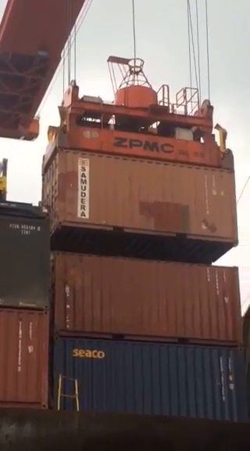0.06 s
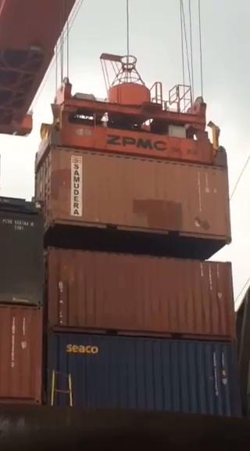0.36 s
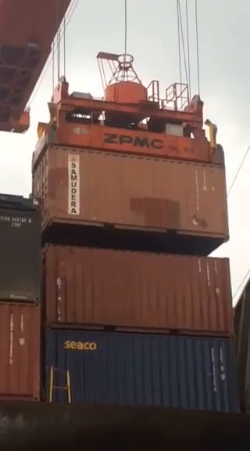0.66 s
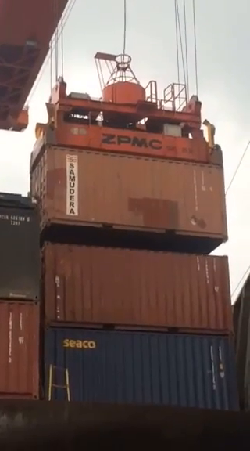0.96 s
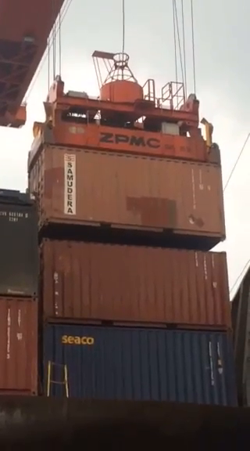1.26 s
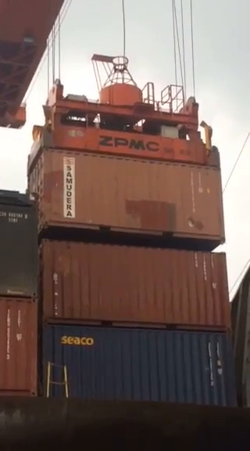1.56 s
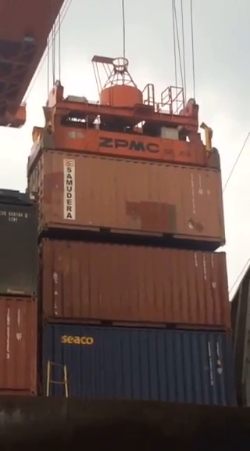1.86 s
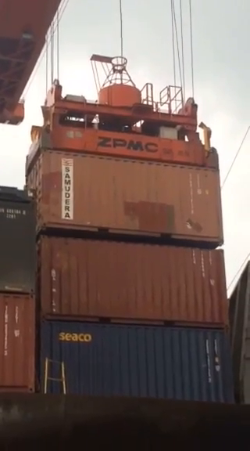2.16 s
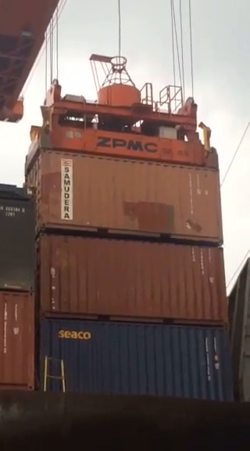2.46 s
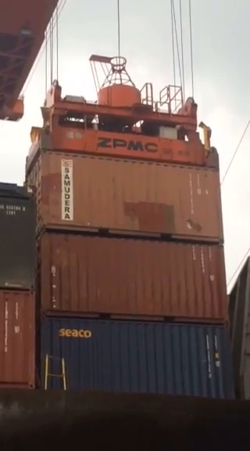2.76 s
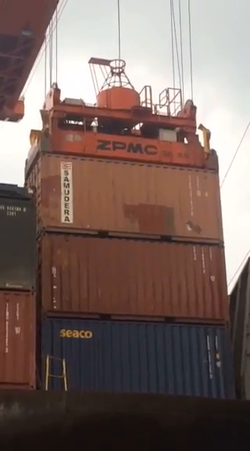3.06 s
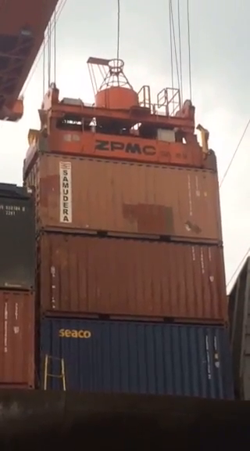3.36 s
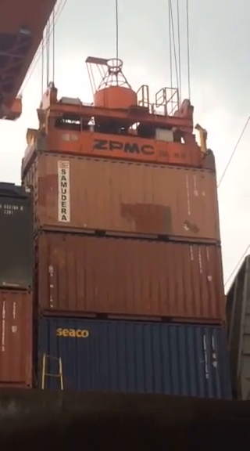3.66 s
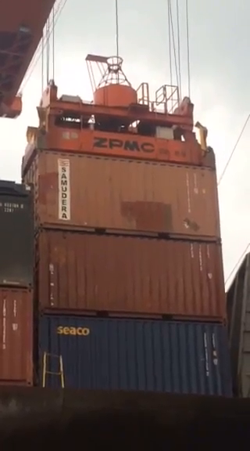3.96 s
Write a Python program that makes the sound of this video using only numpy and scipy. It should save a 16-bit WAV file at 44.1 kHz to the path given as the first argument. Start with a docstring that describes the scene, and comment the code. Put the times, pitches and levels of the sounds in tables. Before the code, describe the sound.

Metal clashes and deep hollow booms ring out as a crane lands a shipping container, tens of metres away outdoors. Before that come a steady engine rumble, a thin drive whine, a short hiss and a first boom.

```python
"""A crane sets a steel container on a stack, some tens of metres away in a port.
At first machinery rumbles and sings while the hoist drive whines. Near 1 s comes a dull pop, like wind
on the microphone, then a hiss, and at 1.5 s a first boom. From about 2.7 s the corners scrape and clash
and the hollow boxes boom. Last, the spreader (the crane's lifting frame) rattles as it settles,
and the whine fades. Steel walls all round smear every clash and boom."""
import sys
import numpy as np
from scipy import signal
from scipy.fft import rfft, irfft
from scipy.io import wavfile

SR = 44100
rng = np.random.default_rng(int(sys.argv[2]) if len(sys.argv) > 2 else 0)


def master_out(mix):
    """Clip the mix to full scale and print it as 16-bit PCM to the path in sys.argv[1]."""
    frames = np.transpose(np.atleast_2d(mix))
    ceiling = np.clip(frames, -1, 1)
    pcm = np.round(ceiling * 32767).astype(np.int16)
    wavfile.write(sys.argv[1], SR, pcm)


N = 176400
T = np.arange(N) / SR
FREQS = np.maximum(np.arange(N // 2 + 1) * SR / N, 1)

# Steel hits steel. Each row: start in seconds, level in dB, rise in seconds, tilt in dB per octave.
STEEL_HITS = [(1.495, -40, 0.0086, 0), (1.77, -36, 0.071, -1), (2.745, -31, 0.022, -23),
              (2.825, -33, 0.029, -2.5), (2.885, -25, 0.028, -2), (2.93, -25.5, 0.065, 1),
              (3.024, -21.5, 0.0053, -0.5), (3.052, -23, 0.009, -1.5), (3.103, -32, 0.0075, 2),
              (3.165, -29, 0.024, -1), (3.218, -24.5, 0.015, 2), (3.244, -21, 0.009, 5),
              (3.288, -24.5, 0.0092, 0), (3.319, -21.5, 0.01, 1), (3.341, -20, 0.005, -12),
              (3.354, -25, 0.0035, 0.5), (3.41, -35.5, 0.016, -1), (3.535, -41, 0.0097, 7),
              (3.62, -30.5, 0.01, 1.5), (3.648, -29, 0.015, -6), (3.728, -38, 0.004, 5.5),
              (3.78, -44, 0.017, 5.5)]
# The tone colour of a clash. Each row: frequency in Hz, relative level in dB.
CLASH_SPECTRUM = [(150, -20.5), (300, 0), (480, 2), (750, -2.5), (1050, 0), (1450, -3.5), (1900, -6),
                  (3000, -13), (4500, -20), (6500, -26.5), (9000, -37)]
# How a clash dies away. Each row: frequency in Hz, fade time (t60, the time to fall 60 dB) in seconds.
CLASH_FADES = [(200, 0.68), (1000, 0.57), (3000, 0.38), (8000, 0.23)]
# Ringing frames and corners. Each row: pitch in Hz, relative level in dB, fade time in seconds.
FRAME_NOTES = [(468.5, 5.5, 0.3), (583, 1, 0.53), (655.7, 12.5, 0.27), (787, -10, 0.27), (908, 2, 0.83),
               (1054, -10.5, 0.96), (1112, -7.5, 1), (1310, 8.5, 0.35), (1450, -15, 0.34), (1703, -9, 0.22),
               (1728, -2, .4), (2010, -3, 0.77), (2663, -9, 0.34)]
# The load falls on the hollow boxes. Each row: start in seconds, level in dB, favoured pitch in Hz,
# spread in octaves, rise in seconds, fade time in seconds.
BOX_BLOWS = [(1.498, -21.5, 132, 0.85, 0.0039, 0.37), (2.914, -37, 250, 0.33, 0.0043, 0.41),
             (3.084, -16.5, 198, 0.2, 0.013, 1.4), (3.153, -17.5, 75, 0.088, 0.013, 0.4),
             (3.205, -16, 74.4, 0.18, 0.033, 0.78), (3.249, -18.5, 259, 0.24, 0.0062, 0.88),
             (3.261, -18, 202, 0.061, 0.032, 0.94), (3.335, -22, 129, 1.23, 0.0053, 0.74),
             (3.423, -20.5, 69, 0.59, 0.0091, .7), (3.484, -22, 154, 1.22, 0.0048, 1.66),
             (3.51, -20, 96.6, 0.13, 0.028, 2.2), (3.631, -17, 83.5, 0.41, 0.018, 0.8),
             (3.645, -21, 204, 0.13, 0.026, 0.72), (3.729, -22, 99, 0.15, 0.011, 1),
             (3.89, -28, 100, 0.24, .02, 2)]
# Wall and floor panels. Each row: pitch in Hz, relative level in dB, fade time in seconds.
PANEL_NOTES = [(59.5, 3, 0.6), (76.7, -10, 1.3), (98.4, -4, 1.8), (119, 9.5, 0.5), (158, 9, 0.5),
               (193.8, 3, 1.5), (202.9, -4, 2.6), (230.6, 3.5, 2), (262.8, -5.5, 1.3), (322, -8.5, 0.6),
               (355, -17, 0.6), (397, -9.5, 0.6)]
# Dull low thumps: a microphone pop, then knocks during the landing.
# Each row: time in seconds, level in dB, pitch in Hz.
LOW_THUMPS = [(0.9101, -18, 270), (0.922, -26, 168), (.933, -26.5, 200), (3.033, -16, 201),
              (3.2315, -13, 112), (3.261, -10.5, 214), (3.43, -16, 126), (3.487, -12, 175),
              (3.643, -13, 90), (3.942, -24.5, 293.4)]
# The drive's main switching tones. Each row: pitch in Hz, starting point for the level in dB.
WHINE_TONES = [(3977.5, -51.5), (4002, -67), (4026, -58)]
# The whine over time. Each row: time in seconds, dB added to the main tones, then the levels in dB
# of the lower side tone, the upper side tone and the doubled tone.
WHINE_LEVELS = [(0, 2, -64, -66, -67), (.2, 1.5, -60, -54, -66), (.65, 1.5, -60, -67.5, -60.5),
                (1.35, 0, -62, -54, -64), (1.7, -1.5, -66, -68, -69.5), (2.35, 1.5, -53, -62, -63.5),
                (2.8, -4.5, -58, -63, -73), (3.5, -6, -65, -80, -73), (4, -14, -81, -76, -74)]
# Two singing tones. Each row: time in seconds, lower tone's level in dB, upper tone's level in dB.
SINGING_LEVELS = [(0, -57, -56.5), (.25, -40.5, -48.5), (.5, -40, -55), (.7, -43.5, -56), (.85, -55, -56.5),
                  (1.35, -58, -56.5), (1.55, -43.5, -47), (1.68, -42, -52), (1.97, -48.5, -44.5),
                  (2.12, -44, -59), (2.62, -54, -57), (2.82, -50.5, -45), (2.92, -62.5, -62),
                  (4, -67, -64.5)]
# The lower singing tone turns rough. Each row: time in seconds, unsteady share from 0 to 1.
SINGING_ROUGHNESS = [(.6, 0.04), (1.5, 0.28)]
# The tone colour of the machinery. Each row: frequency in Hz, relative level in dB.
MACHINE_SPECTRUM = [(22, -29), (35, -13), (55, -3.5), (102, 0), (150, -2), (212, -4.5), (330, -11.5),
                    (474, -15.5), (800, -16.5), (1550, -21.5), (2500, -28), (3640, -34), (4500, -38.5),
                    (8000, -45), (9000, -45.5)]
# The machinery over time. Each row: time in seconds, bass level in dB, treble level in dB.
MACHINE_LEVELS = [(0, -35, -40), (.45, -32, -41), (.7, -33, -39.5), (1.2, -33.5, -41), (1.65, -29, -38.5),
                  (2.2, -30, -39.5), (2.45, -28, -40.5), (2.62, -27.5, -41), (2.9, -27, -39),
                  (3.4, -28.5, -33.5), (4, -28, -45)]
# Deep swells of the rumble. Each row: time in seconds, level in dB, pitch in Hz.
RUMBLE_SWELLS = [(.15, -34, 130), (.32, -34.5, 55), (.58, -25.5, 60), (.81, -34.5, 120), (1.0, -35.5, 70),
                 (1.39, -30, 80), (2.33, -41, 70), (2.43, -23.5, 90), (2.76, -33.5, 120)]
# Short hisses. Each row: start in seconds, level in dB, hold in seconds.
HISS_BURSTS = [(1.153, -42, 0.12), (1.635, -57, 0.13)]
# The tone colour of a hiss. Each row: frequency in Hz, relative level in dB.
HISS_SPECTRUM = [(600, -11), (1500, -3), (2550, 0), (2940, 2.5), (3300, 0.5), (4500, -10.5), (6200, -15),
                 (8500, -27)]


def clashes():
    """Each clash is a rush of tiny contacts that sets the steel ringing; the treble dies first."""
    contacts_per_s, contact_db, ring_db = 450, -4, -6.5
    centres = np.log([hz for hz, _ in CLASH_FADES])
    bands = [np.interp(np.log(FREQS), centres, row) for row in np.eye(len(centres))]
    bass_cut = FREQS / np.hypot(FREQS, 150)
    colour = undb(by_pitch(CLASH_SPECTRUM, FREQS)) * sheet_resonances() * bass_cut
    octaves = np.log2(np.maximum(FREQS, 200) / 1000)
    note_octaves = np.log2([note[0] for note in FRAME_NOTES])
    out = np.zeros(N)
    for start, db, rise, tilt in STEEL_HITS:
        contacts = unit((rng.random(N) < contacts_per_s / SR) * rng.standard_normal(N))
        scrape = rng.standard_normal(N) + undb(contact_db) * contacts
        spectrum = rfft(scrape) * colour * undb(tilt * octaves)
        spectrum *= undb(db) / np.std(irfft(spectrum, N))
        for band, (_, t60) in zip(bands, CLASH_FADES):
            out += irfft(spectrum * band, N) * strike(start, rise, t60)
        weights = undb(tilt * note_octaves + 6.3 * rng.standard_normal(len(FRAME_NOTES)))
        out += undb(db + ring_db) * ring(FRAME_NOTES, start, rise, weights)
    return out


def sheet_resonances(spacing_hz=16, depth_db=3.6):
    """Sheet steel has countless small resonances: a random gain for each frequency."""
    heights = rng.standard_normal(4096)
    return undb(depth_db * np.interp(FREQS / spacing_hz, np.arange(len(heights)), heights))


def ring(notes, start, rise, weights, detune=0.0041):
    """Struck steel rings at its own notes, each slightly off pitch and fading at its own speed."""
    out, first = np.zeros(N), int(start * SR)
    age = T[:min(N - first, SR)]
    gains = undb([note[1] for note in notes]) * weights
    gains /= np.linalg.norm(gains)
    for (hz, _, t60), gain in zip(notes, gains):
        phase, chance = rng.random(2)
        pitch = hz * (1 + detune * (chance - .5))
        fade = np.exp(-np.log(1000) * age / t60)
        out[first:first + len(age)] += gain * fade * np.sin(2 * np.pi * (pitch * age + phase))
    return np.sqrt(2) * out * np.clip((T - start) / max(rise, 1e-3), 0, 1)


def booms(shudder_db=-2):
    """Panels ring low until the load damps them; a narrow spread of pitches sings, a wide one shudders."""
    panel_hz = np.array([note[0] for note in PANEL_NOTES])
    out = np.zeros(N)
    for start, db, hz, spread, rise, t60 in BOX_BLOWS:
        favour = lambda f: bell(np.log2(f / hz), spread) + 1e-9
        panels = ring(PANEL_NOTES, start, 0, favour(panel_hz))
        share = undb(shudder_db) * spread
        shudder = share * noise(favour(FREQS) / np.sqrt(FREQS))
        out += undb(db) * (panels + shudder) / np.hypot(1, share) * strike(start, rise, t60)
    return out


def thumps(width_cycles=0.27):
    """A microphone pop, then the landing's knocks: each thump is one heavily damped swing."""
    return sum(undb(db) * 1.74 * np.sin(2 * np.pi * hz * (T - at)) * bell((T - at) * hz, width_cycles)
               for at, db, hz in LOW_THUMPS)


def yard_echo(sound, level_db=-14.5, treble_edge_hz=3500):
    """The stacks and the ship's side throw back a blurred echo."""
    tail = noise(1 / np.hypot(1, FREQS / treble_edge_hz)) * strike(0, rise=0.011, t60=1.58)
    return undb(level_db) * signal.fftconvolve(sound, tail / np.linalg.norm(tail))[:N]


def hoist_whine(drift_hz=2.85, waver_db=.8):
    """The drive's switching whines until the load is off, its side tones trading strength."""
    low_side_hz, high_side_hz, doubled_hz = 3800, 4180, 7985  # the last is twice the switching rate
    waver = lambda hz: tone(hz, drift_hz) * undb(waver_db * wander(5.1))
    main = sum(undb(db) * waver(hz) for hz, db in WHINE_TONES) * undb(curve(WHINE_LEVELS, 1))
    low_side = waver(low_side_hz) * undb(curve(WHINE_LEVELS, 2))
    high_side = waver(high_side_hz) * undb(curve(WHINE_LEVELS, 3))
    doubled = tone(doubled_hz, 2 * drift_hz) * undb(curve(WHINE_LEVELS, 4) + 1.4 * wander(24))
    return main + low_side + high_side + doubled


def singing(lower_hz=789.4, upper_hz=1571):
    """Two tones in the machinery swell and fade."""
    rough = curve(SINGING_ROUGHNESS, 1)
    lower = np.sqrt(1 - rough ** 2) * tone(lower_hz, drift_hz=1.5)
    lower += rough * rough_tone(lower_hz, width_hz=31)
    upper = rough_tone(upper_hz, width_hz=19)
    return lower * undb(curve(SINGING_LEVELS, 1)) + upper * undb(curve(SINGING_LEVELS, 2))


def machinery(bass_edge_hz=412, flicker_db=2):
    """Engines and fans make a restless rumble under a smoother rush."""
    colour = undb(by_pitch(MACHINE_SPECTRUM, FREQS))
    bass = 1 / np.hypot(1, (FREQS / bass_edge_hz) ** 3)
    treble = np.sqrt(1 - bass ** 2)
    rumble = noise(colour * bass) * undb(curve(MACHINE_LEVELS, 1) + flicker_db * wander(9.3))
    rush = noise(colour * treble) * undb(curve(MACHINE_LEVELS, 2) + .5 * wander(24))
    return rumble + rush


def swells(width_s=0.031, width_octaves=.6):
    """The rumble wells up for a moment."""
    return sum(undb(db) * noise(bell(np.log2(FREQS / hz), width_octaves)) * bell(T - at, width_s)
               for at, db, hz in RUMBLE_SWELLS)


def hisses():
    """Each hiss rises quickly, holds briefly and dies away."""
    loudness = sum(undb(db) * strike(at, rise=0.043, t60=1.45, hold=hold) for at, db, hold in HISS_BURSTS)
    return noise(undb(by_pitch(HISS_SPECTRUM, FREQS))) * loudness


def undb(db):
    """Turn decibels into a gain."""
    return 10 ** (np.asarray(db) / 20)


def unit(x):
    """Scale to an average power of 1."""
    return x / np.sqrt(np.mean(x ** 2))


def bell(offset, width):
    """A smooth hump, highest at offset 0."""
    return np.exp(-.5 * (offset / width) ** 2)


def curve(rows, column):
    """Follow a table's column through time in straight lines."""
    rows = np.array(rows)
    return np.interp(T, rows[:, 0], rows[:, column])


def by_pitch(rows, hz):
    """Read between a table's rows, with octaves evenly spaced."""
    rows = np.array(rows)
    return np.interp(np.log(hz), np.log(rows[:, 0]), rows[:, 1])


def noise(gain):
    """Noise of power 1, coloured by a gain for each frequency."""
    return unit(irfft(rfft(rng.standard_normal(N)) * gain, N))


def wander(rate_hz):
    """A smooth random wobble, about 1 in size."""
    return noise(np.exp(-(FREQS / rate_hz) ** 2) + 1e-12)


def strike(start, rise, t60, hold=0):
    """The loudness of a blow: a straight rise, an optional hold, then a fade."""
    age, rise = T - start, max(rise, 1e-3)
    fade = np.exp(-np.log(1000) * np.maximum(age - rise - hold, 0) / t60)
    return np.clip(age / rise, 0, 1) * fade


def tone(hz, drift_hz):
    """A pure tone whose pitch drifts a little."""
    return np.sqrt(2) * np.sin(2 * np.pi * np.cumsum(hz + drift_hz * wander(13.6)) / SR)


def rough_tone(hz, width_hz):
    """A wavering tone: noise in one sharp resonance."""
    return noise(1 / (1 + ((FREQS - hz) / width_hz) ** 2))


def scene():
    """The landing and its echo over the machinery, in one channel."""
    landing = clashes() + booms()
    foreground = landing + yard_echo(landing) + thumps()
    background = machinery() + hisses() + swells() + hoist_whine() + singing()
    return (foreground + background)[None]


def record(dry, fade_s=.005, top_hz=8450):
    """Fade quickly in and out, and cut the highest treble."""
    fade = np.clip(np.minimum(T, T[-1] - T) / fade_s, 0, 1)
    treble_cut = signal.ellip(8, .2, 80, top_hz, fs=SR, output="sos")
    return signal.sosfilt(treble_cut, dry * fade)


dry = scene()
out = record(dry)
master_out(out)
```